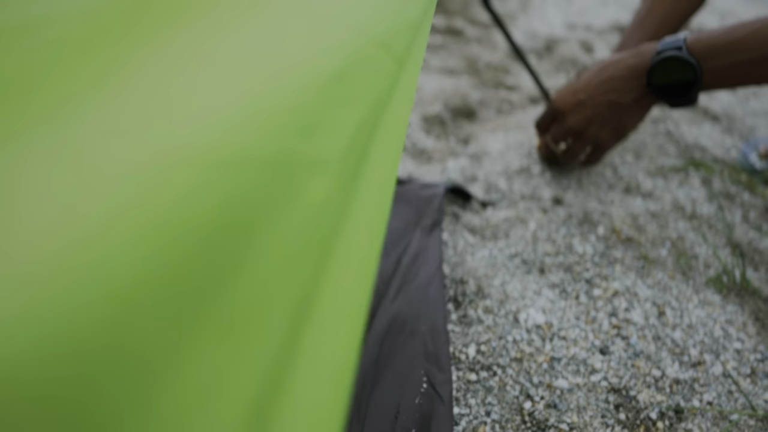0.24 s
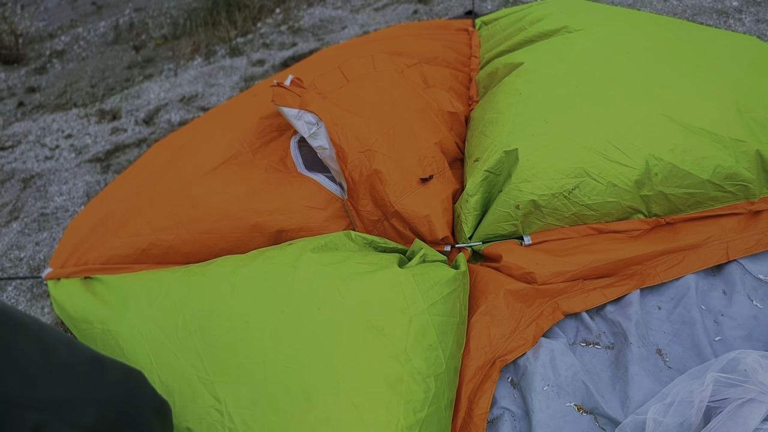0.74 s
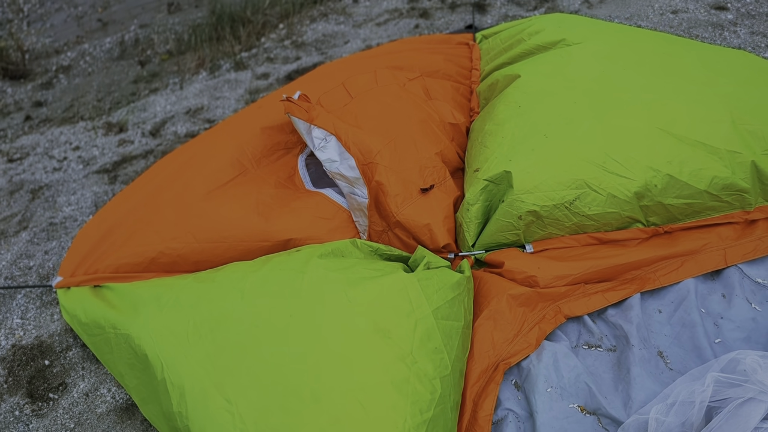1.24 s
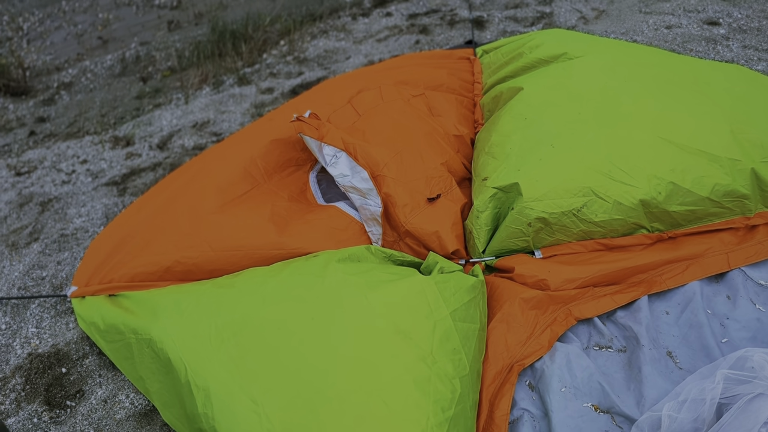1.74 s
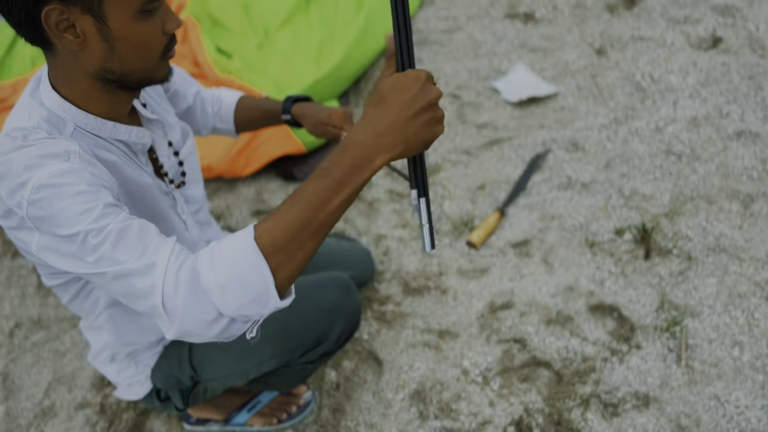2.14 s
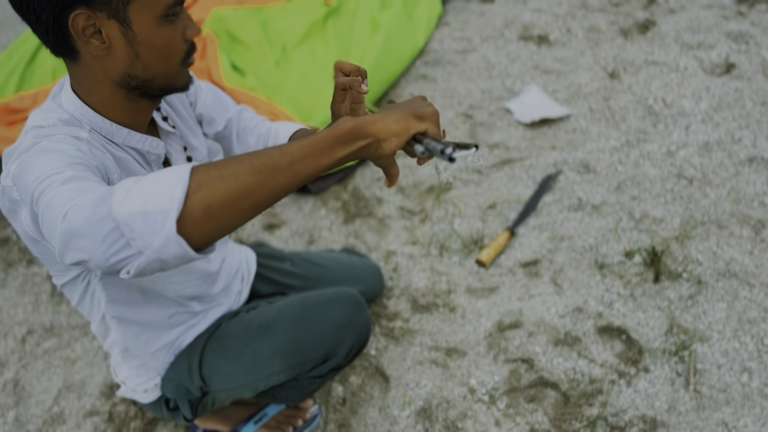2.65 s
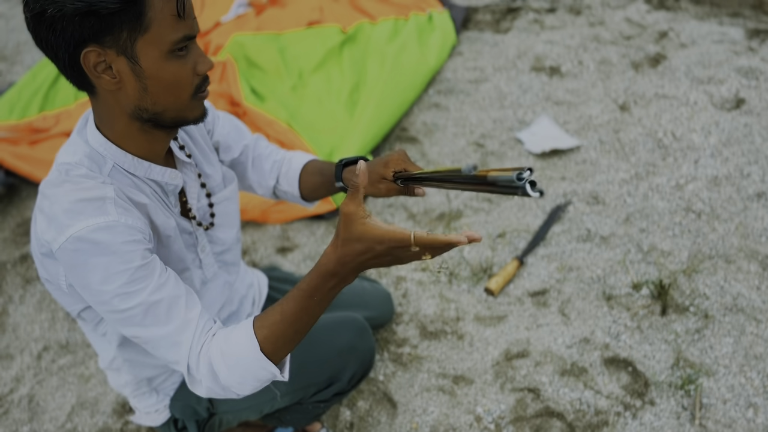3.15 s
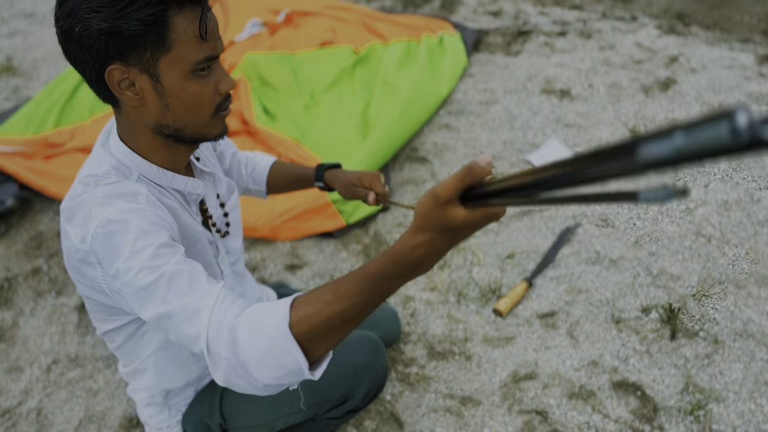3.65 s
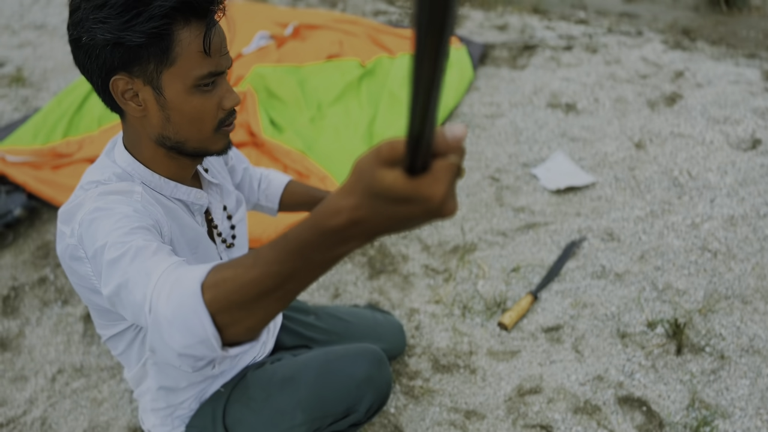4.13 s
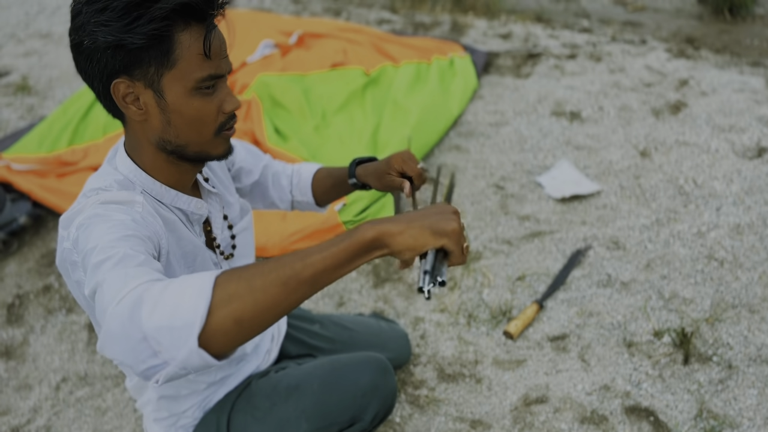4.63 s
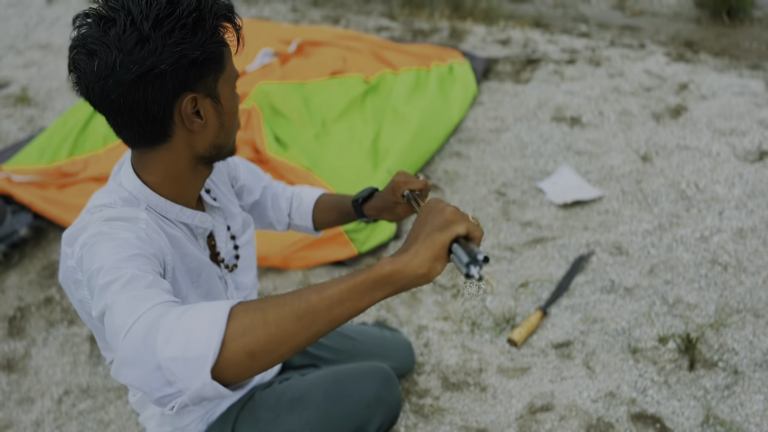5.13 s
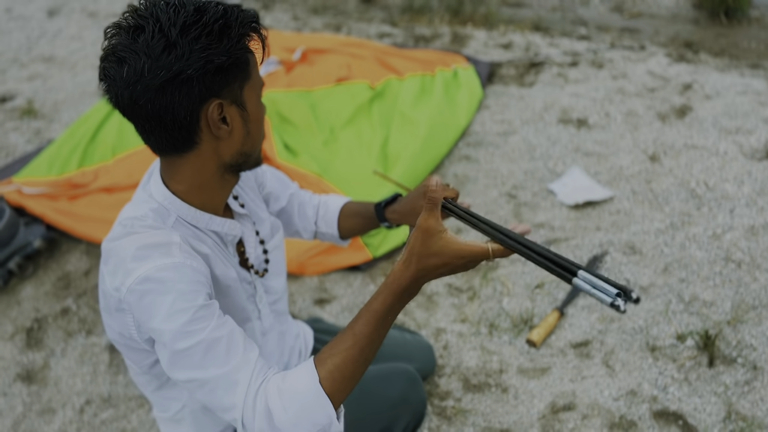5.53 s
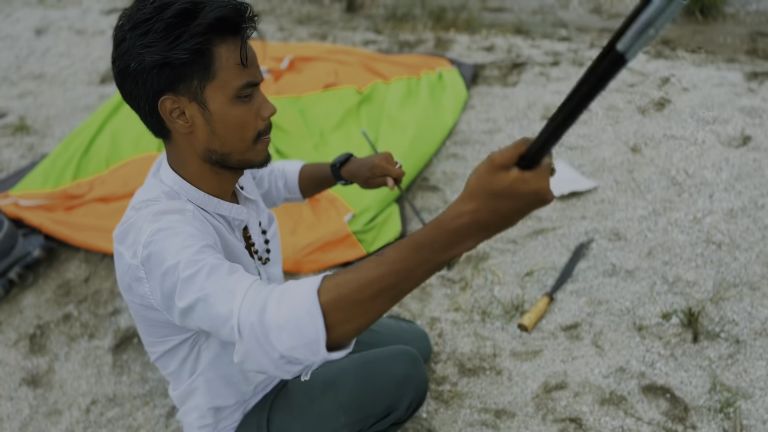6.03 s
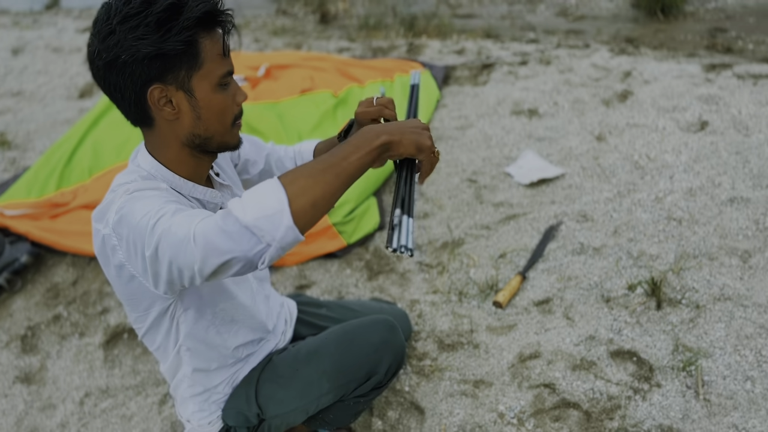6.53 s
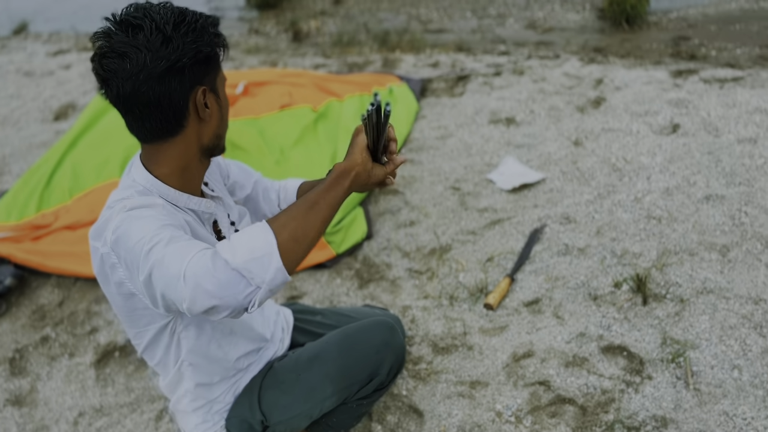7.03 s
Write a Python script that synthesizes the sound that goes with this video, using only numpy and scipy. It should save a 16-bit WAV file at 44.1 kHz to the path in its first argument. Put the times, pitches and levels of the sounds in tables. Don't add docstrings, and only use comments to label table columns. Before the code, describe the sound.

Outdoors on a windy sandy riverbank, tent nylon flaps very close with low wind thumps for under half a second. A cut brings nylon swipes, crackling creases and short squeaks. After another cut, jointed poles clack in dry, bright irregular clusters, the hardest blow near the middle, with faint sleeve brushing. Water murmurs, a thin insect pulses and a far bird whistles twice. Close stereo microphone.

```python
import sys
import numpy as np
from scipy import signal
from scipy.fft import rfft, irfft, next_fast_len
from scipy.io import wavfile
from scipy.ndimage import uniform_filter1d, minimum_filter1d

SR = 44100
rng = np.random.default_rng(int(sys.argv[2]) if len(sys.argv) > 2 else 0)


def dump(signal):
    limited = np.clip(np.atleast_2d(signal).T, -1, 1)
    pcm = np.round(limited * 32767).astype(np.int16)
    wavfile.write(sys.argv[1], SR, pcm)


def undo_db(level):
    steps = np.asarray(level, float) / 20
    return 10 ** steps


N = 321048

# frequency in Hz, difference in dB.
POLE_SIDE = [(1000, 5), (1900, 0.5), (3500, 0.5), (5500, 4), (8000, 2)]
# frequency in Hz, difference in dB.
WIDE_SIDE = [(100, -2), (1000, 1.5), (1900, 0.5), (4000, 8), (5500, 2.5), (8000, 0.5)]


def rms_one(x):
    return x / np.sqrt(np.mean(x ** 2) + 1e-20)


def at_hz(points, hz):
    return np.interp(np.log(hz), np.log(np.array(points)[:, 0]), np.array(points)[:, 1])


def in_time(rows, outside=None):
    s, *columns = np.transpose(rows)
    return [np.interp(np.arange(N) / SR, s, c, outside, outside) for c in columns]


def drift(rate):
    r = np.exp(-80 * np.pi * rate / SR)
    slow = signal.lfilter([1], [1, -2 * r, r * r], rng.standard_normal(N // 40 + 2002))[2000:]
    return np.interp(np.arange(N) / 40, np.arange(len(slow)), rms_one(slow))


def band(x, low_hz, high_hz, order=2):
    return signal.sosfilt(signal.butter(order, [low_hz, high_hz], "band", fs=SR, output="sos"), x)


def colour(x, tone):
    hz = np.maximum(np.fft.rfftfreq(N, 1 / SR), 1)
    return irfft(rfft(x) * undo_db(at_hz(tone, hz)), N)


def patchy(white, tone, patchy_db, rate, low_db=0, split_hz=1):
    white = rms_one(colour(white, tone))
    together = drift(rate)
    out, below = 0, 0
    for top in np.geomspace(2 * tone[0][0], .49 * SR, 6):
        upto = signal.sosfiltfilt(signal.butter(2, top, fs=SR, output="sos"), white)
        gain_db = patchy_db * (together + 1.8 * drift(3.3 * rate)) + low_db * (top < split_hz)
        out = out + undo_db(gain_db) * (upto - below)
        below = upto
    return out


def ports(two, side, treble_shared=1):
    # frequency in Hz, lead of the left in radians.
    phase_lead = [(100, 0), (450, .3), (1000, 1.6), (1170, 3.14), (1400, 2.2), (1800, .2), (3200, 1.0),
                  (5000, .5), (6200, -.9), (7300, -2.3), (7800, -3.08), (8800, -3.2), (11300, -6.1),
                  (12300, -6.4), (14700, -9.36), (17000, -9.6)]
    # frequency in Hz, shared part from 0 to 1.
    likeness = [(60, 0.91), (250, 0.83), (700, 0.12), (1170, 0.46), (1400, 0.06), (1900, 0.78),
                (3500, 0.84), (5400, 0.37), (7000, 0.64), (8000, 0.36)]
    single_hz, blend_hz = 7800, 1200
    size = next_fast_len(N + 4096)
    hz = np.maximum(np.fft.rfftfreq(size, 1 / SR), 1)
    a, b = rfft(two, size)
    apart = np.clip((single_hz - hz) / blend_hz, 0, 1)
    shared = np.clip(treble_shared + apart * (at_hz(likeness, hz) - treble_shared), 0, 1)
    lead = np.interp(hz, *np.transpose(phase_lead))
    tilt = undo_db(apart * at_hz(side, hz) / 2)
    right = (shared * a + np.sqrt(1 - shared ** 2) * b) * np.exp(-1j * lead)
    even = np.sqrt(2 / (tilt ** 2 + tilt ** -2))
    return irfft(np.array([a * tilt, right / tilt]) * even, size)[:, :N]


def from_right(x):
    return np.array([np.roll(x[0], 18), x[1]])


def swells(s, level_db, rise_s, fall_s, rest_db=-120):
    swell_db = 13.5
    t = np.arange(0, N + 64, 64) / SR - np.array(s)[:, None]
    rising = -t / np.maximum(rise_s, .003)[:, None]
    falling = t / np.maximum(fall_s, .003)[:, None]
    lost = np.maximum(rising, falling)
    power = np.sum(undo_db(2 * (level_db[:, None] - swell_db * lost)), axis=0) + undo_db(2 * rest_db)
    return np.interp(np.arange(N) / 64, np.arange(len(power)), 10 * np.log10(power))


def swings(rows, rough):
    out = np.zeros(N)
    for s, peak_db, start_hz, end_hz, length in rows:
        u = np.arange(round(length * SR)) / (length * SR)
        pitch_hz = end_hz + (start_hz - end_hz) * (1 - u) ** 2
        swing = np.sin(2 * np.pi * np.cumsum(pitch_hz) / SR)
        out[round(s * SR):][:len(u)] += undo_db(peak_db) * swing * np.sin(np.pi * u ** 0.5)
    return out * (1 + rough * np.array([drift(126), drift(100)]))


def river(near, rush_db):
    # frequency in Hz, level in dB per Hz.
    water_tone = [(150, -42.5), (230, -15), (420, -6), (800, -5), (1200, -10), (1550, -17), (2200, -27),
                  (6000, -67)]
    # time in seconds, level in dB.
    water_level = [(.42, -59), (.6, -49.5), (1.58, -48), (2.14, -49), (2.16, -56), (2.45, -53.5),
                   (2.75, -49.5), (4.38, -52), (6.2, -50), (6.6, -53.5), (7.28, -48.5)]
    level_db = np.where(near, rush_db - 0.5, in_time(water_level)[0])
    return ports(undo_db(level_db) * patchy(rng.standard_normal((2, N)), water_tone, 1.0, 14), WIDE_SIDE)


def insects():
    # centre in Hz, width in Hz, level in dB, phrases per second, pulses per second.
    singer = (10350, 400, -78, 3.85, 140)
    hz, width_hz, level_db, phrases, pulses = singer
    t = np.arange(N) / SR - 3.37
    gate = ((t * phrases) % 1 < .75) * (1 + np.sin(2 * np.pi * pulses * t))
    song = rms_one(band(rng.standard_normal((2, N)), hz - width_hz / 2, hz + width_hz / 2))
    return ports(undo_db(level_db + 2.0 * drift(3.0)) * gate * song, POLE_SIDE)


def bird():
    # time in seconds, pitch in Hz, level in dB.
    whistles = [
        [(2.272, 2050, -73), (2.298, 1990, -55), (2.318, 1940, -67), (2.332, 2050, -61)],
        [(2.731, 1670, -54), (2.742, 1750, -45), (2.759, 1960, -53), (2.768, 1870, -45.5), (2.785, 1900, -54),
         (2.8, 1650, -64), (2.82, 1610, -61)],
    ]
    out = 0
    for note in whistles:
        pitch_hz = in_time(note)[0] * (1 + 0.011 * drift(80))
        level_db = in_time(note, outside=-120)[1] + 2.5 * drift(50)
        out = out + undo_db(level_db) * np.sin(2 * np.pi * np.cumsum(pitch_hz) / SR)
    return np.sqrt(2) * out


def gusts(rows, deep_db, per_doubling_db=0):
    s, level_db, half_s, depth_db = np.transpose(rows)
    brief_s = 0.66 * half_s
    deep_db = deep_db + 2.42 * depth_db + per_doubling_db * np.log2(half_s / .2)
    deep = swells(s, level_db + deep_db, brief_s, brief_s)
    middle = swells(s, level_db + depth_db, brief_s, brief_s)
    return np.array([deep, middle, swells(s, level_db, half_s, half_s)])


def wind_levels(near):
    # peak in seconds, level in dB, half length in seconds, depth in dB.
    open_gusts = [(.51, -53, 0.28, 7.5), (.8, -59.5, 0.49, 5), (1.2, -46.5, 0.13, 6.5),
                  (1.39, -57, 0.048, 11.5), (1.46, -41, 0.087, -6.5), (1.57, -34.5, 0.035, -38),
                  (1.78, -38, 0.068, -37), (2.02, -48, 0.47, -20), (2.38, -51, 0.28, 1.5),
                  (2.73, -46, 0.16, 4), (2.97, -48, 0.27, -8), (3.3, -53, 0.48, -14.5),
                  (3.85, -55.5, 0.24, -1), (4.08, -53, 0.1, -2), (4.25, -54, 0.6, -4), (4.56, -56, 0.18, 5),
                  (4.76, -55, 0.057, 7), (5.02, -51.5, 0.06, 12.5), (5.11, -50, 0.14, -2.5),
                  (5.42, -52, 0.21, -1), (5.65, -49.5, 0.11, 1.5), (5.87, -53.5, 0.18, -2),
                  (6.16, -54, 0.19, -0.5), (6.4, -60, 0.56, -5.5), (6.8, -59, 0.2, 2.5),
                  (7.04, -45.5, 0.12, 6), (7.2, -40, 0.045, -12)]
    # peak in seconds, level in dB, half length in seconds, depth in dB.
    close_gusts = [
        (0, -35, 0.018, 11),
        (.075, -31.5, 0.015, 5),
        (.11, -47.5, 0.058, 12),
        (.148, -24.5, 0.02, -6),
        (.2, -31, .12, 1),
        (.38, -42, 0.12, 5),
    ]
    return np.where(near, gusts(close_gusts, deep_db=5.5), gusts(open_gusts, deep_db=-21, per_doubling_db=9.5))


def buffet(deep_db, middle_db, upper_db, near):
    white = rng.standard_normal((4, 2, N))
    deep_near = rms_one(band(white[0], 42.0, 80.6))
    deep_far = rms_one(band(white[1], 72.0, 130.0, order=4))
    deep = np.where(near, deep_near, deep_far)
    middle = rms_one(band(white[2], 115.8, 180.2, order=5))
    upper = rms_one(band(white[3], 175.5, 356.0, order=5))
    lumps = undo_db(deep_db + 1.8 * drift(23)) * deep
    lumps = lumps + undo_db(middle_db - 2.4 * near + 2.8 * drift(16)) * middle
    lumps = lumps + undo_db(upper_db + 3.1 * drift(13)) * upper
    return ports(lumps, WIDE_SIDE)


def cloth(level_db, low_db, tone, side, per_s, spread_db):
    sizes = undo_db(spread_db * np.minimum(rng.exponential(1, N), 5))
    snaps = sizes * (rng.random(N) < per_s / SR)
    crackle = signal.lfilter([1], [1, -.97], snaps) * rng.standard_normal((2, N))
    white = rng.standard_normal((2, N)) + .5 * rms_one(crackle)
    nylon = patchy(white, tone, 0.85, 20, low_db=low_db + 2.0, split_hz=6500)
    return ports(undo_db(level_db) * band(nylon, 250.0, 19000), side)


def flapping(near):
    # time in seconds, level in dB, low part in dB.
    flaps = [
        (0, -42, 16),
        (.012, -46.5, 7),
        (.125, -47, 8),
        (.134, -34.5, 11.5),
        (.222, -34, 12.5),
        (.238, -32.5, 8.5),
        (.32, -34.5, 2.5),
        (.335, -44.5, 10),
        (.412, -58, 15),
    ]
    # start in seconds, peak in dB, start pitch in Hz, end pitch in Hz, length in seconds.
    taut_slaps = [
        (.064, -7.5, 172, 57, .036),
        (0, -17, 60, 45, .03),
        (.383, -18, 75, 50, .03),
        (.056, -20, 430, 240, .0156),
        (.2135, -14, 640, 760, .014),
        (.347, -27, 480, 570, .01),
        (.352, -21, 140, 50, .06),
    ]
    # frequency in Hz, level in dB per Hz.
    flap_tone = [(700, -50), (1200, -14), (2600, -16), (5300, -9), (7700, -9.5), (13800, -13), (15600, -45)]
    # frequency in Hz, difference in dB.
    flap_side = [(60, 2), (400, 8), (1200, 3.6), (2500, 11), (4500, 10.5), (6200, 10), (8000, 6)]
    flaps_now = near * cloth(*in_time(flaps), flap_tone, flap_side, per_s=650, spread_db=8.2)
    return flaps_now + from_right(swings(taut_slaps, rough=0.71) * undo_db([[1.5], [-1.5]]))


def rustling(near, tent):
    # peak in seconds, level in dB, rise in seconds, fall in seconds, low part in dB.
    drags = [
        (.66, -44, 0.15, 0.14, 3.5),
        (0.798, -38.5, 0.04, 0.042, -5),
        (.9, -50.5, 0.18, 0.13, -2),
        (0.987, -40.5, 0.0062, 0.068, -10.5),
        (1.072, -43, .075, 0.067, 0.5),
        (1.25, -47.5, 0.22, 0.18, -4),
        (1.45, -40, 0.265, 0.127, -5.5),
        (1.684, -39.5, 0.047, 0.075, 0.5),
        (1.97, -51, 0.35, 0.56, -1),
    ]
    # peak in seconds, level in dB, rise in seconds, fall in seconds.
    brushes = [(2.28, -51, 0.21, 0.3), (2.56, -52, 0.095, 0.09), (2.73, -53.5, 0.05, 0.46),
               (2.971, -56, 0.54, 0.042), (3.299, -52, .05, 0.2), (3.58, -60.5, 0.46, 0.28),
               (3.96, -57, 0.095, 0.18), (4.36, -58, 0.15, 0.39), (4.56, -56.5, 0.14, 0.14),
               (4.77, -50, 0.1, 0.07), (4.91, -64, 0.19, 0.16), (5.05, -58.5, 0.083, 0.66),
               (5.67, -45.5, 0.094, 0.059), (6.3, -56, 1, 0.28), (6.68, -51.5, 0.19, 0.085),
               (6.95, -59, 0.48, 0.45)]
    # frequency in Hz, level in dB per Hz.
    rustle_tone = [(700, -36.5), (1200, -6), (1900, -4), (4800, -7.5), (5600, -13), (8000, -7.5),
                   (13000, -16.5), (16500, -12)]
    rest_db = -81
    *stroke, low_db = np.transpose(drags)
    drag_db = swells(*stroke, rest_db=rest_db)
    brush_db = swells(*np.transpose(brushes), rest_db=rest_db)
    level_db = np.where(tent, drag_db, brush_db)
    low_db = np.where(tent, np.interp(np.arange(N) / SR, stroke[0], low_db), -1.5)
    return ~near * cloth(level_db, low_db, rustle_tone, WIDE_SIDE, per_s=1200, spread_db=4.6)


def fold():
    # peak in seconds, level in dB, rise in seconds, fall in seconds, pitch in Hz.
    slides = [
        (.62, -57.5, 0.054, .08, 2120),
        (.7, -57, .05, 0.028, 3580),
        (1.069, -45.5, 0.054, 0.019, 3380),
        (1.3, -49.5, 0.06, 0.21, 3820),
        (1.449, -51, 0.17, 0.042, 3240),
        (1.687, -54, 0.033, 0.042, 2870),
    ]
    s, level_db, rise_s, fall_s, hz = np.transpose(slides)
    wide = signal.sosfilt(signal.butter(2, 350.0, fs=SR, output="sos"), rng.standard_normal((2, N)))
    carrier = np.cos(2 * np.pi * np.cumsum(np.interp(np.arange(N) / SR, s, hz)) / SR)
    return ports(undo_db(swells(s, level_db, rise_s, fall_s)) * rms_one(wide * carrier), WIDE_SIDE)


def squeaks():
    # start in seconds, peak in dB, start pitch in Hz, end pitch in Hz, length in seconds.
    slips = [(.59, -54, 2700, 2600, .03), (.61, -49, 2210, 2100, 0.023), (.655, -49, 3800, 3600, 0.027),
             (.66, -52, 2200, 1800, 0.034), (.678, -48, 2930, 3670, 0.049), (2.272, -62, 4050, 4400, .045),
             (2.303, -60, 5200, 5150, 0.027), (2.34, -59, 4400, 3820, .02), (.768, -43, 1850, 1900, .015),
             (1.66, -48, 1820, 1860, .035), (1.665, -46, 2700, 2900, .04), (1.695, -44, 1850, 1780, 0.015),
             (1.712, -46, 1780, 1810, 0.021)]
    return swings(slips, rough=0.6)


def knocks():
    # start in seconds, peak in dB, start pitch in Hz, end pitch in Hz, length in seconds.
    hollow_ends = [
        (4.032, -54, 2090, 2050, 0.012),
        (4.098, -66, 4070, 3800, 0.015),
        (4.101, -57, 2350, 2250, .012),
        (4.111, -57, 1980, 2450, 0.012),
        (4.104, -57, 1700, 1700, 0.015),
        (4.12, -54.5, 1490, 1410, 0.023),
        (4.79, -47, 1430, 1440, 0.01),
    ]
    return swings(hollow_ends, rough=0.27)


def contacts():
    # peak in seconds, level in dB, dull part in dB, rattle t60 in seconds, loudest mode in Hz.
    clacks = [(2.2603, -24, 0.5, .025, 4100), (2.4875, -29.5, -3, .02, 4530), (2.5129, -25, 2, .028, 5100),
              (2.551, -23.5, -2.5, 0.025, 5160), (2.5797, -23, 3.5, .028, 7300),
              (2.6953, -19.5, 2, .035, 6670), (2.8996, -25.5, -1, .038, 4550),
              (2.9468, -23, 0.5, 0.047, 4640), (2.963, -19.5, -2.5, .05, 5140),
              (2.977, -27, 3, 0.057, 4240), (3.2846, -20.5, -4.5, 0.025, 4400),
              (3.2873, -5, -7.5, .022, 5900), (3.3165, -24, -4.5, .03, 4200),
              (4.4428, -22.5, -1.5, .015, 5460), (4.4559, -20, 0.5, 0.0182, 4460),
              (4.557, -22.5, -1.5, .025, 6250), (4.7506, -25, 1, .025, 2200),
              (4.763, -25.5, -8, 0.036, 4750), (4.7634, -19.5, -9, .03, 6600), (4.768, -19, -2, .02, 4800),
              (4.7717, -20.5, -31, 0.029, 5040), (5.0126, -23, -0.5, .021, 4970),
              (5.056, -30, 7, 0.073, 4600), (5.0673, -24.5, 5, .035, 4600),
              (5.1524, -20.5, 4.5, 0.025, 5100), (5.591, -25, 0, 0.043, 2410), (5.6628, -25, -2, .03, 7000),
              (5.6715, -19, 8, .03, 3700), (5.683, -17, 6, 0.033, 4300), (5.6859, -17, -12, .015, 3560),
              (5.689, -14, -6, 0.012, 3150), (5.6923, -19.5, 0.5, 0.04, 5660),
              (5.829, -30, 5.5, 0.045, 2790), (5.9453, -32, 3.5, 0.028, 5700),
              (6.301, -23.5, 3, .016, 3960), (6.5648, -30, -1, 0.028, 5340), (6.581, -29, -1, 0.041, 5330),
              (6.921, -33.5, -13, 0.029, 5300), (7.0464, -33, 7.5, 0.033, 5100)]
    # peak in seconds, level in dB, dull part in dB, loudest mode in Hz.
    ticks = [(0.854, -40, 17, 4800), (2.4407, -41, 16, 6100), (2.49, -36, -5, 6500), (2.54, -35, 5, 5300),
             (2.5707, -35.5, 0.5, 2900), (2.5751, -35, -0.5, 4000), (2.7706, -48, 21, 2500),
             (2.8233, -45, 14, 1800), (2.8621, -37.5, 14, 1850), (2.9371, -40.5, 12.5, 2800),
             (3.255, -36.5, 1.5, 5600), (3.2681, -40, 13, 5500), (3.3385, -44.5, 10.5, 3000),
             (3.9572, -35.5, 3, 2700), (3.9719, -32, -4, 4600), (4.5693, -38, 2, 2900),
             (4.5758, -32.5, 10, 5200), (4.5883, -37.5, 7.5, 5500), (4.7395, -31, -7, 5500),
             (4.938, -38, 6, 4800), (5.017, -31, -5, 5100), (5.0331, -35, 4.5, 5100), (5.08, -40, 14, 4100),
             (5.2996, -31.5, -1, 3200), (5.3519, -33.5, 9.5, 2600), (5.5078, -45.5, 23, 4300),
             (5.5407, -33.5, 9, 2900), (5.6115, -39, 3, 2400), (5.6493, -36, 10, 4200),
             (5.9544, -38, 12, 5800), (6.0507, -48.5, 21.5, 3700), (6.1285, -50, 19.5, 5300),
             (6.4851, -45.5, 20, 3700), (6.5296, -34.5, 4.5, 3700), (6.575, -33, 1, 3000),
             (6.673, -42, 15, 3100), (6.6894, -34, 19, 5200), (6.7054, -41, 6, 4800),
             (6.7203, -40, 14, 4900), (7.0263, -34.5, 2, 3100)]
    # peak in seconds, level in
    # dB, build-up in ms.
    rubs = [(2.4225, -45.5, 1.5), (2.7152, -49.5, 5), (2.88, -43, 6), (2.9995, -33.5, 1.8),
            (3.3825, -47, 2.5), (3.5244, -51, 7.6), (3.606, -51.5, 5.1), (4.53, -49.5, 9),
            (4.666, -50, 11.3), (4.905, -43.5, 6.4), (5.565, -40, 1.7), (5.639, -35.5, 12), (5.658, -31, 4),
            (5.68, -28, 3.8), (6.594, -48, 3), (6.64, -48, 6.1), (6.7, -44, 4.4), (6.9718, -49, 22),
            (5.1485, -38, 3), (4.934, -42, 1.5), (2.692, -40, 2), (2.5207, -40, 1), (6.5685, -37, 1),
            (5.8436, -43, 1), (5.0535, -40, 1.5)]
    meetings = []
    for s, db, dull_db, t60, hz in clacks:
        build_ms = 0.72 * undo_db(0.6 * (db + 25))
        meetings.append((s, db, dull_db, build_ms, t60, hz))
    for s, db, dull_db, hz in ticks:
        meetings.append((s, db, dull_db, 0.7, 0.03, hz))
    for s, db, build_ms in rubs:
        meetings.append((s, db, 7.5, build_ms, 17 * build_ms / 1000, 3480))
    return meetings


def resonance(z, mode_hz, width_hz):
    r, w = np.exp(-np.pi * width_hz / SR), 2 * np.pi * mode_hz / SR
    return (1 - r * r) / 2 * (1 - z * z) / (1 - 2 * r * np.cos(w) * z + r * r * z * z)


def poles():
    # frequency in Hz, width in Hz.
    rod_modes = [(2050, 200), (3030, 220), (3700, 88), (4470, 100), (5400, 200), (6150, 190), (7500, 450),
                 (9100, 1100), (10300, 270), (11800, 430), (12700, 500), (14500, 1000)]
    # frequency in Hz, level in dB per Hz.
    clack_tone = [(700, -28), (1300, -16), (2700, -6), (4500, -3.5), (7500, -1), (12000, -2), (14600, -4),
                  (16500, -19.5)]
    size, early, smooth = 4096, 512, 40
    out = np.zeros((2, N + size))
    t = (np.arange(size) - early) / SR
    hz = np.maximum(np.fft.rfftfreq(size, 1 / SR), 1)
    z = np.exp(-2j * np.pi * hz / SR)
    for s, level_db, dull_db, build_ms, t60, loud_hz in contacts():
        lumps = uniform_filter1d(rng.standard_normal(size), smooth) * np.sqrt(smooth)
        rattle = rng.standard_normal((2, size)) * undo_db(3.5 * rng.standard_normal(size) + 2.4 * lumps)

        build_ms = max(build_ms, .2)
        build = undo_db(12 * t * 1000 / build_ms) * (t > -.002 * build_ms)
        approach = undo_db(-40 + 650 * t)
        release = undo_db(-60 * np.abs(t) / max(t60, .004)) + undo_db(-33.0 - 60 * t / 0.19)
        crack = (t >= 0) * undo_db(-60 * t / 0.005)
        shape = np.where(t < 0, build + approach, release) + crack

        body = 0.71 + undo_db(4.5) * resonance(z, loud_hz, 250)
        for (mode_hz, width_hz), (pull, push) in zip(rod_modes, rng.standard_normal((len(rod_modes), 2))):
            mode = resonance(z, mode_hz * (1 + 0.05 * pull), width_hz)
            body = body + undo_db(-2.0 + 4.8 * np.clip(push, -2, 1.2)) * mode
        dull = 1 + (undo_db(dull_db + 0.5) - 1) / (1 + 1j * hz / 7000) ** 2
        hit = irfft(rfft(rattle * shape) * body * dull * undo_db(at_hz(clack_tone, hz)), size)
        peak = np.sqrt(uniform_filter1d(hit[0] ** 2, smooth).max())
        at = round(s * SR) - early
        out[:, at:at + size] += undo_db(level_db) * hit / peak
    return ports(out[:, :N], POLE_SIDE, treble_shared=0.97)


def scene():
    # time in seconds, fade out in seconds, fade in in seconds.
    changes = [
        (0.415, 0.0025, 0.051),
        (2.148, 0.015, 0.034),
    ]
    t = np.arange(N) / SR
    near, tent = t < changes[0][0], t < changes[1][0]
    wind_db = wind_levels(near)
    air = buffet(*wind_db, near) + river(near, wind_db[2])
    air = np.where(near, from_right(air), air)
    fabric = flapping(near) + rustling(near, tent) + fold() + squeaks()
    mix = air + insects() + bird() + fabric + knocks() + poles()
    mix = signal.sosfiltfilt(signal.butter(2, 30.0, "high", fs=SR, output="sos"), mix, padtype="even")
    for s, fade_out, fade_in in changes:
        mix = mix * np.clip(np.maximum((s - t) / fade_out, (t - s) / fade_in), .05, 1)
    return mix


def top_cut(x):
    return signal.sosfilt(signal.butter(12, 15770, fs=SR, output="sos"), x)


def record(dry):
    limit, span = .95, 41
    cut = signal.sosfilt(signal.cheby2(8, 50, 17000, fs=SR, output="sos"), dry)
    room = limit / np.maximum(np.abs(cut).max(axis=0), limit)
    held = cut * uniform_filter1d(minimum_filter1d(room, span), span)
    return top_cut(held)


dry = scene()
out = record(dry)
dump(out)
```